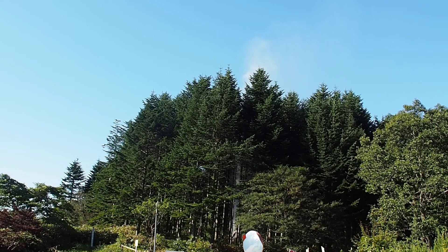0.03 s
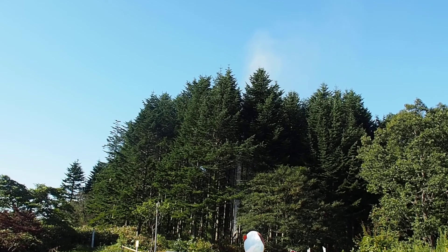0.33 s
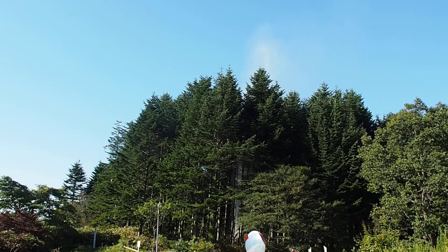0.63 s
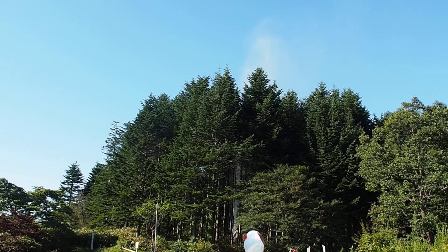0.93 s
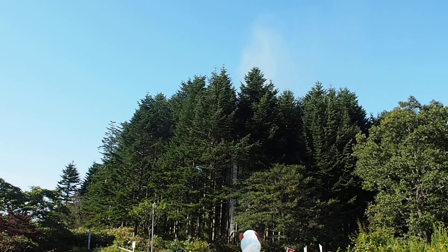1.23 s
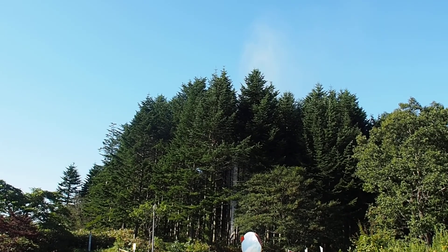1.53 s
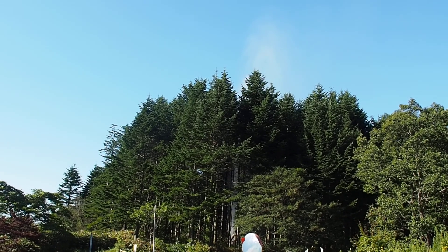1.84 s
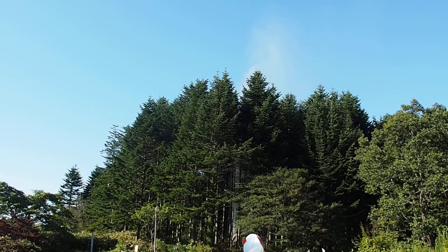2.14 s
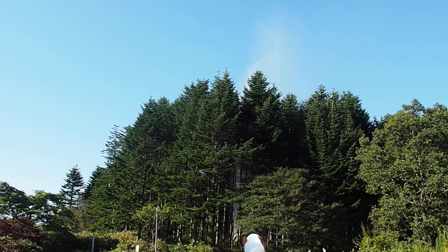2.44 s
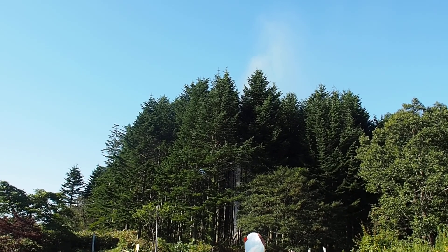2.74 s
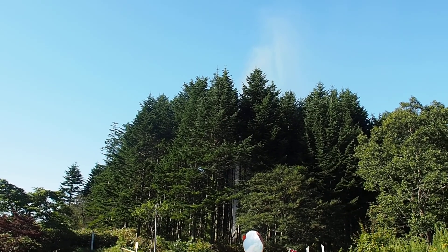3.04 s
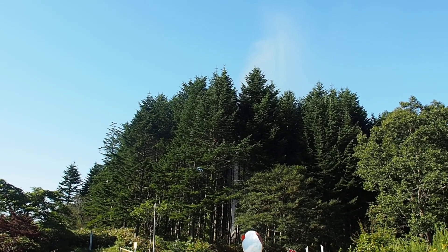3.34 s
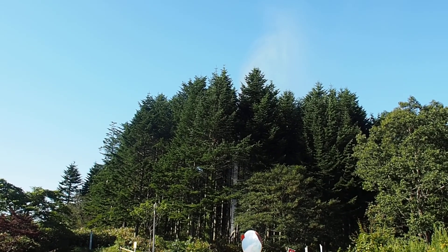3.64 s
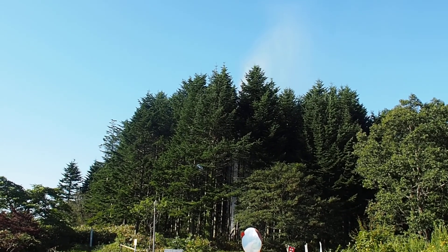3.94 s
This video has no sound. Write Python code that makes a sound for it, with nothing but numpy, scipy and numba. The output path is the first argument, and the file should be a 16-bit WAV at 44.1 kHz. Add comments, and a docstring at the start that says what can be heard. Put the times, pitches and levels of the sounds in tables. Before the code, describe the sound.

Outdoors, a geyser erupts continuously with a low churning rumble, a rush of water and steam, and a splashy hiss. It surges several times, about every three quarters of a second, beyond trees in front of the microphone.

```python
"""Geyser behind trees

A geyser jets behind a stand of trees, surging about every three quarters of a second.
Steam pockets collapse in the vent as a deep rumble that opens upward with each surge. The jet roars
through the vent's fixed resonances and tears into hissing spray, which the trees scatter wide."""
import sys
import numpy as np
from scipy import signal
from scipy.fft import rfft, irfft
from scipy.io import wavfile
from scipy.ndimage import uniform_filter1d
from numba import njit

SR = 44100
rng = np.random.default_rng(int(sys.argv[2]) if len(sys.argv) > 2 else 0)


def int16_out(signal):
    """Quantize to a 16-bit WAV file."""
    q = np.round(np.clip(np.atleast_2d(signal).T, -1, 1) * 32767)
    wavfile.write(sys.argv[1], SR, q.astype(np.int16))


N = 176400


def undb(db):
    """Decibels to gain."""
    return 10 ** (np.asarray(db) / 20)


def unit(x):
    """Scale to rms 1."""
    return x / np.sqrt(np.mean(x ** 2))


def curve(table, column=1):
    """One column of a time table as an envelope, at every sample."""
    rows = np.array(table, float)
    return np.interp(np.arange(N) / SR, rows[:, 0], rows[:, column])


def colour(x, points):
    """EQ through (f/Hz, level/dB) points joined on a log-frequency axis."""
    hz, db = np.array(points, float).T
    f = np.maximum(np.fft.rfftfreq(N, 1 / SR), 1)
    gain = undb(np.interp(np.log(f), np.log(hz), db))
    return irfft(rfft(x) * gain, N)


def resonate(x, hz, width):
    """One resonance: gain 1 at its centre, `width` Hz between its -6 dB points."""
    f = np.maximum(np.fft.rfftfreq(N, 1 / SR), 1)
    detuning = hz / width * (f / hz - hz / f)
    return irfft(rfft(x) / (1 + 1j * detuning) ** 2, N)


@njit
def lowpass(x, cutoff_hz):
    """State-variable low-pass with a moving cutoff."""
    y, band_state, low_state = np.empty(len(x)), 0., 0.
    for i in range(len(x)):
        g = np.tan(np.pi * cutoff_hz[i] / SR)
        band = (band_state + g * (x[i] - low_state)) / (1 + g * (g + 1.2))
        y[i] = low_state + g * band
        band_state, low_state = 2 * band - band_state, 2 * y[i] - low_state
    return y


def flutter(per_s):
    """Random levels, each gliding into the next; rms 1."""
    steps = rng.standard_normal(N // 10)
    held = steps[(np.arange(N) * per_s / SR).astype(int)]
    return unit(uniform_filter1d(held, int(SR / per_s)))


def impacts(per_s, spread_db):
    """Randomly timed pushes of either sign, most small and a few large; rms 1."""
    hit = rng.random(N) < per_s / SR
    size = undb(spread_db * np.minimum(rng.exponential(size=N), 4))
    return unit(hit * size * np.sign(rng.standard_normal(N)))


def steady(x, window_s=0.048, share=0.82):
    """The pressure behind the vent evens out a share of the rumble's chance swings; rms 1."""
    window = int(window_s * SR)
    power = uniform_filter1d(uniform_filter1d(unit(x) ** 2, window), window)
    return unit(x / np.maximum(power, 1e-6) ** (share / 2))


# Heave of the water column, the deep rumble's envelope: t/s, level/dB
HEAVE_ENVELOPE = [(0.14, -23.5), (0.15, -34), (0.33, -16.5), (0.36, -24), (0.73, -21.5), (1.14, -26.5),
                  (1.16, -22), (1.39, -19.5), (1.45, -34), (1.47, -20), (1.63, -31), (1.77, -21),
                  (2.33, -27.5), (2.39, -16.5), (2.42, -29), (2.86, -16.5), (2.93, -33), (3.11, -38),
                  (3.13, -26), (3.48, -23), (3.54, -32), (3.57, -23.5), (3.99, -19.5), (4.0, -22)]
# Churn in the vent, the upper rumble's envelope: t/s, level/dB
CHURN_ENVELOPE = [(0.14, -45), (0.19, -45), (0.31, -25.5), (0.69, -20.5), (0.97, -38), (1.13, -40),
                  (1.19, -28), (1.49, -23.5), (1.52, -30.5), (1.69, -36), (1.73, -33.5), (1.78, -35),
                  (1.82, -24.5), (2.2, -22), (2.5, -37.5), (2.76, -22), (3.0, -39.5), (3.47, -32),
                  (3.53, -36.5), (3.77, -22.5), (3.78, -24.5), (4.0, -21)]
# Sub-bass weight of the heave: f/Hz, level/dB
HEAVE_EQ = [(20, -29), (31, -10), (40, -13), (50, 1.5), (70, 1), (100, -1), (128, -6), (160, -14),
            (230, -26)]
# Low-mid body of the churn: f/Hz, level/dB
CHURN_EQ = [(80, -24.5), (120, -3), (140, -0.5), (160, -5.5), (186, 0.5), (215, -1.5), (250, -0.5),
            (275, -10.5), (330, -12), (420, -9.5), (700, -24)]
def rumble():
    """Collapsing steam pockets shake the water column; harder churning makes them sharper."""
    base_hz, base_db, db_per_octave = 194, -24, 13.5  # the cutoff rides the churn envelope
    churn_db = curve(CHURN_ENVELOPE)
    octaves = (churn_db - base_db) / db_per_octave
    cutoff_hz = np.clip(base_hz * 2 ** octaves, 20, SR / 10)

    deep_pockets = colour(impacts(per_s=260, spread_db=2.5), HEAVE_EQ)
    upper_pockets = colour(impacts(per_s=260, spread_db=2.5), CHURN_EQ)
    heave = steady(lowpass(deep_pockets, cutoff_hz)) * undb(curve(HEAVE_ENVELOPE))
    churn = steady(lowpass(upper_pockets, cutoff_hz)) * undb(churn_db)
    return heave + churn


def turbulence():
    """Dense slaps of water in the white noise of rushing steam."""
    return impacts(per_s=1500, spread_db=3.5) + rng.standard_normal(N)


# Surges of the jet, ahead of the layer trims: t/s, roar level/dB, spray level/dB, mist level/dB
JET_ENVELOPES = [(0.14, -42, -45, -55.5), (0.26, -34.5, -37, -47.5), (0.43, -25.5, -31.5, -42.5),
                 (0.44, -32.5, -31.5, -43.5), (0.47, -28.5, -31.5, -43), (0.65, -23, -25.5, -39),
                 (0.66, -25, -26.5, -38), (0.86, -31.5, -34, -46), (1.2, -33, -37, -46),
                 (1.29, -27.5, -33, -44.5), (1.44, -30.5, -32.5, -45), (1.66, -34.5, -35.5, -46.5),
                 (1.98, -29, -34, -44.5), (2.12, -21.5, -27, -39.5), (2.2, -24.5, -28.5, -42),
                 (2.32, -30, -32.5, -46), (2.46, -32, -34.5, -45), (2.64, -31.5, -36.5, -45.5),
                 (2.7, -33.5, -33, -47.5), (2.73, -27.5, -34, -43), (2.82, -28.5, -31.5, -43),
                 (2.96, -34, -37, -47), (3.67, -32.5, -36, -46), (3.77, -27, -33, -43),
                 (3.85, -29.5, -31.5, -44.5), (3.92, -26.5, -31, -40), (3.99, -23, -30.5, -40)]
# Fixed resonances of the vent: f/Hz, half-width/Hz, relative level/dB
VENT_MODES = [(404.2, 12.7, -5), (462.4, 11.3, -4), (497.4, 9.4, 2.5), (521.5, 16, -8), (598, 14.5, -2),
              (725, 11.7, -0.5), (875, 7.5, -1.5), (889, 7.6, -5), (999, 15.5, 3), (1076, 9.2, -17),
              (1820, 14, -10), (2029, 26, -8), (2205, 13, -13), (2947, 11, -9.5)]
# Broad midrange of the rush: f/Hz, level/dB
ROAR_EQ = [(150, -17), (260, -6.5), (340, -6.5), (420, -3.5), (560, -0.5), (660, -3), (850, -0.5),
           (1040, -2), (1120, -6.5), (1210, -20.5), (1500, -20.5), (2500, -55)]
def roar(sputter, sputter_db=0.7):
    """Turbulence and slapping water ring the vent over a broad rush."""
    push = turbulence()
    rings = sum(undb(db) * unit(resonate(push, hz, 2 * half_width)) for hz, half_width, db in VENT_MODES)
    rush = colour(turbulence(), ROAR_EQ)
    body = undb(-1.9) * unit(rush) + undb(-4.5) * unit(rings)
    return body * undb(curve(JET_ENVELOPES) + sputter_db * sputter)


# Splashy presence of the spray and its drops: f/Hz, level/dB
SPRAY_EQ = [(700, -26), (1200, -10), (1400, -9.5), (1580, -2), (1800, -0.5), (2200, -3), (2900, -3.5),
            (3400, -6.5), (4100, -8.5), (5000, -17), (7000, -36), (10000, -60)]
# Airy top of the fine mist: f/Hz, level/dB
MIST_EQ = [(2500, -34), (4200, -4.5), (5100, -1.5), (6600, -0.5), (8400, -3.5), (10200, -9.5), (11800, -18),
           (13200, -29), (15500, -35)]
def spray(sputter, sputter_db=0.37):
    """The jet tears into spray with a dense patter of drops and a fine hissing mist."""
    sheet = undb(-0.45) * unit(colour(rng.standard_normal(N), SPRAY_EQ))
    drops = undb(-10) * unit(colour(impacts(per_s=4000, spread_db=3.5), SPRAY_EQ))
    splash = (sheet + drops) * undb(curve(JET_ENVELOPES, column=2))
    mist = unit(colour(rng.standard_normal(N), MIST_EQ)) * undb(curve(JET_ENVELOPES, column=3))
    return (splash + mist) * undb(sputter_db * sputter)


def geyser(sputter):
    """Rumble, roar and spray in mono, from fresh noise on every call."""
    return rumble() + roar(sputter) + spray(sputter)


# Scatter off the trees, side relative to mid: f/Hz, level/dB
TREE_SCATTER = [(30, -25), (90, -30), (180, -31), (700, -24.5), (1100, -22.5), (1500, -18), (2800, -13.5),
                (5600, -9.8), (9500, -4.5), (13000, -3)]
def scene():
    """The geyser straight ahead; the trees scatter its treble to the sides."""
    sputter = flutter(per_s=45)  # roar and spray flicker together
    mid = geyser(sputter)
    side = colour(geyser(sputter), TREE_SCATTER)
    return mid + side * np.array([[1], [-1]])


# Microphone response, near flat above the lowest bass: f/Hz, level/dB
MICROPHONE_EQ = [(22, -16), (32, -8), (42, 1), (11500, 0), (13500, -1)]
def record(dry):
    """The sound cuts in, its peaks soft-clipped; the microphone drops the lowest bass and the top."""
    start_s, fade_s = 0.127, 0.0024
    ceiling, top_hz = 0.43, 15700
    fade_in = np.clip((np.arange(N) / SR - start_s) / fade_s, 0, 1)
    rounded = dry / (1 + (dry / ceiling) ** 8) ** (1 / 8)
    heard = colour(rounded, MICROPHONE_EQ) * fade_in
    high_cut = signal.ellip(8, .2, 70, top_hz, fs=SR, output="sos")
    return signal.sosfilt(high_cut, heard)


dry = scene()
out = record(dry)
int16_out(out)
```